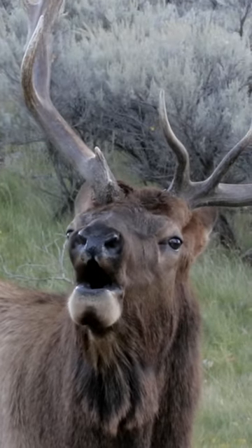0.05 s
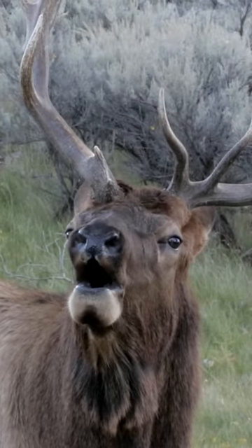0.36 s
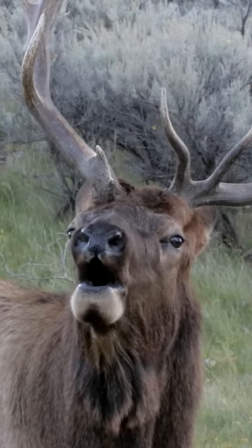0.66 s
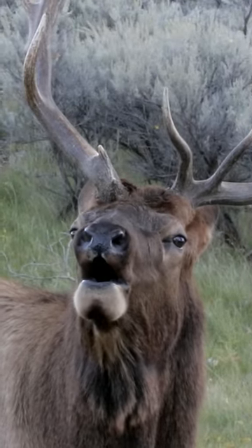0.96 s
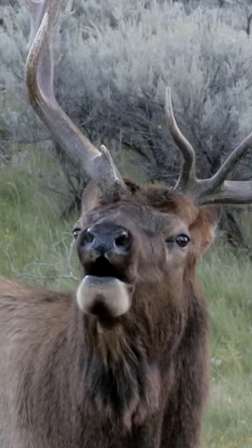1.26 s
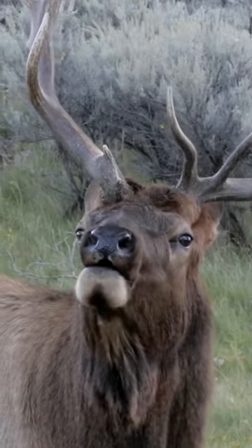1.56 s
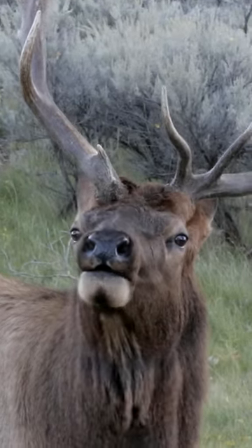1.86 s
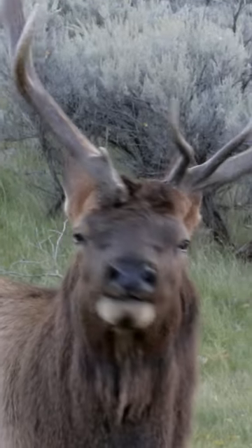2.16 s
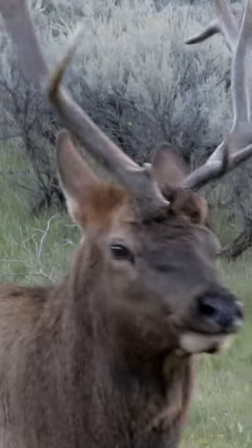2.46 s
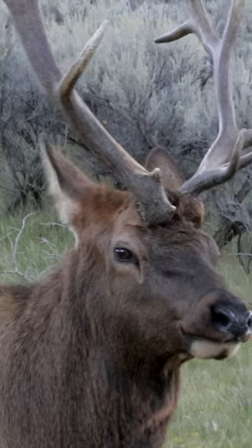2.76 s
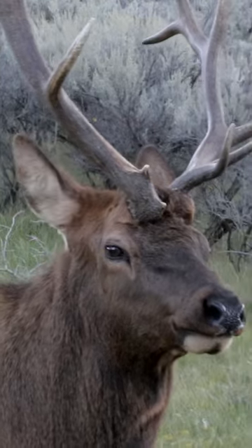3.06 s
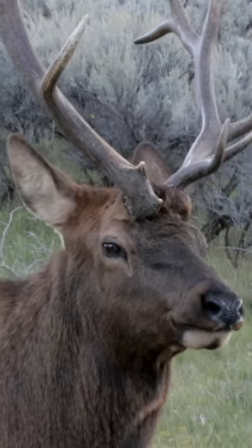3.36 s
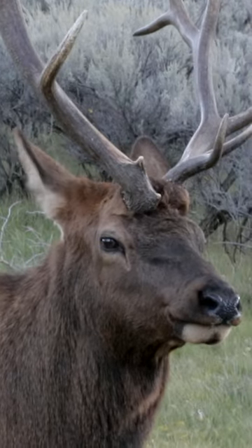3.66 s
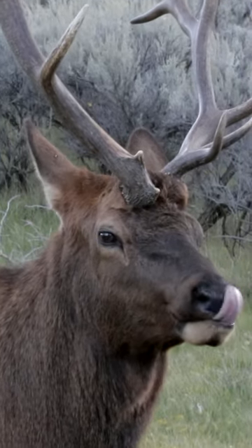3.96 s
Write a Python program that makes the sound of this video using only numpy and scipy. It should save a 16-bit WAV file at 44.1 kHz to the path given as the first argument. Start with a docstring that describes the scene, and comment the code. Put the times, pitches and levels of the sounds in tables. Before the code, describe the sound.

A bull elk bugles loudly close by in open country. Its high whistle holds for about 0.6 seconds, then slides down in steps over a hoarse roar, ending in a short whoop at 1.7 seconds with a faint echo. Small birds chirp faintly around 2 and 3.5 seconds, and two soft dry hisses come near 3 seconds. A quiet rumble and distant hum lie underneath.

```python
"""A bull elk bugles close by in open country: a high whistle holds, slides down in steps and ends in a
short whoop, over a hoarse low roar of the vocal folds that rings the resonances of his long throat.
The hillside returns a faint tail. Then small birds chirp and two dry hisses sound.
A quiet rumble and a far hum lie under it all."""
import sys
import numpy as np
from scipy import signal
from scipy.fft import rfft, irfft
from scipy.io import wavfile

SR = 44100
rng = np.random.default_rng(int(sys.argv[2]) if len(sys.argv) > 2 else 0)


def store_pcm(level_fs):
    """Save levels as 16-bit WAV."""
    pcm = np.round(np.clip(level_fs, -1, 1) * 32767).astype(np.int16)
    wavfile.write(sys.argv[1], SR, np.atleast_2d(pcm).T)


N = 176400
T = np.arange(N) / SR


def amp(db):
    """Decibels to gain."""
    return 10 ** (np.asarray(db) / 20)


def unit_rms(x):
    """Scales to rms 1."""
    return x / np.sqrt(np.mean(abs(x) ** 2) + 1e-20)


def curves(table):
    """Each value column of a time table, per sample."""
    times_s, *columns = np.transpose(table)
    return [np.interp(T, times_s, column) for column in columns]


def at_hz(table, hz):
    """Interpolates a table over log frequency."""
    table_hz, values = np.transpose(table)
    return np.interp(np.log(hz + 1), np.log(table_hz), values)


def colour(x, spectrum):
    """Filters x by a dB spectrum, to rms 1."""
    gain = amp(at_hz(spectrum, np.fft.rfftfreq(N, 1 / SR)))
    return unit_rms(irfft(rfft(x) * gain, N))


def drift(rate_hz):
    """Complex low-pass noise at rms 1."""
    white = rng.standard_normal(N) + 1j * rng.standard_normal(N)
    rolloff = (1 + (np.fft.fftfreq(N, 1 / SR) / rate_hz) ** 2) ** 1.346
    return unit_rms(np.fft.ifft(white / rolloff))


def phase_of(hz):
    """Running phase of a pitch curve."""
    return 2 * np.pi * np.cumsum(hz) / SR


def noise_tone(phase, width_hz):
    """Narrow noise band around a running phase."""
    return unit_rms((drift(width_hz) * np.exp(1j * phase)).real)


def hoarse_tone(phase, noise_share, width_hz):
    """Part sine, part noise band, at constant power."""
    clear = np.sqrt(2 * (1 - noise_share ** 2)) * np.cos(phase)
    return clear + noise_share * noise_tone(phase, width_hz)


# Each row: frequency in Hz, relative density in dB.
RUMBLE_SPECTRUM = [(12, -23.5), (20, 3), (86, -3.5), (124, -11), (227, -11), (261, -15.5), (364, -13.5),
                   (395, -16), (466, -19), (582, -19.5), (1260, -20.5), (2130, -31), (3600, -31.5),
                   (12100, -44.5), (14700, -57.5)]
# Each row: frequency in Hz, left-right correlation 0-1.
RUMBLE_CORRELATION = [(100, 0.92), (400, 0.73), (1500, 0.63), (5000, 0.64), (12000, 0.45)]
# Each row: frequency in Hz, width in Hz, level in dB.
HUM_TONES = [(108.6, 9.6, -75), (128.4, 6.7, -75), (262.5, 3.6, -77.5), (394, 5.5, -77.5)]


def rumble_and_hum(rumble_db=-64.5, left_bias_db=1.5):
    """Low outdoor rumble with a far wavering hum."""
    shared, own = (rfft(colour(rng.standard_normal(N), RUMBLE_SPECTRUM)) for _ in range(2))
    correlation = at_hz(RUMBLE_CORRELATION, np.fft.rfftfreq(N, 1 / SR))
    right = correlation * shared + np.sqrt(1 - correlation ** 2) * own
    rumble = amp(rumble_db) * irfft(np.array([shared, right]), N)
    hum = sum(amp(db) * noise_tone(2 * np.pi * hz * T, width_hz) for hz, width_hz, db in HUM_TONES)
    return (rumble + hum) * amp([[left_bias_db / 2], [-left_bias_db / 2]])


# Each row: frequency in Hz, T60 in seconds.
HILLSIDE_T60 = [(300, 0.31), (2500, 0.38), (6500, 0.68), (12000, 0.4)]


def hillside(x, density=.05, rise_s=.011):
    """Scattered echoes from brush and slope, different in each channel."""
    taps = rng.standard_normal((2, SR)) * (rng.random((2, SR)) < density)
    taps *= np.minimum(T[:SR] / rise_s, 1)
    hz, t, bands = signal.stft(taps, SR, nperseg=256)
    decay = amp(-60 * t / at_hz(HILLSIDE_T60, hz)[:, None])
    tail = signal.istft(bands * decay, SR, nperseg=256)[1]
    return signal.fftconvolve(x[None], tail / np.linalg.norm(tail[0]), axes=1)[:, :N]


# Each row: start in seconds, length in seconds, level in dB.
HISS_BURSTS = [(2.878, 0.15, -59.5), (3.075, 0.12, -57.5)]
# Each row: frequency in Hz, relative density in dB.
HISS_SPECTRUM = [(710, -54), (1200, -19), (1710, -9.5), (3180, -6.5), (3460, -9.5), (5440, 1.5),
                 (7140, -6.5), (8540, -15), (13500, -25), (14700, -34)]


def hisses(rise_s=.042, fall_s=.046, grain_db=3, grain_hz=270, echo_db=-8.5):
    """Two grainy bursts of hiss with their echo."""
    envelope = np.zeros(N)
    for start_s, length_s, db in HISS_BURSTS:
        rise = np.clip((T - start_s) / rise_s, 0, 1)
        fall = np.exp(-np.maximum(T - start_s - length_s + fall_s, 0) / fall_s)
        envelope += amp(db) * rise * fall
    grains = rng.standard_normal(N) * amp(grain_db * drift(grain_hz).real)
    out = envelope * colour(grains, HISS_SPECTRUM)
    return out + amp(echo_db) * hillside(out)


# Each row: start and length in seconds, first, middle and last pitch in Hz, level in dB, rasp 0-1.
BIRD_NOTES = [(2.026, 0.036, 4360, 4530, 5880, -67.5, 0.9), (2.055, 0.026, 2890, 4220, 3120, -58, 0.6),
              (2.068, 0.037, 3475, 3204, 3040, -67.5, 0.47), (2.081, 0.035, 6830, 5180, 6300, -69.5, 0.97),
              (2.103, 0.025, 3000, 3280, 2750, -59, 0.2), (2.118, 0.037, 2900, 2830, 2570, -60, 0.07),
              (2.76, 0.092, 8380, 7270, 6600, -74, 1), (3.318, 0.049, 1750, 1914, 1593, -73, 0.7),
              (3.501, 0.028, 2940, 3460, 5550, -71, 1), (3.511, .062, 5020, 6590, 5520, -57.5, 0.48),
              (3.517, 0.052, 7400, 8500, 8700, -69, 0.7), (3.515, 0.07, 4670, 4590, 4860, -70, 0.6),
              (3.524, 0.042, 2164, 2250, 2620, -72, 0.6), (3.976, 0.074, 4380, 4940, 4570, -68, 0.8)]


def birds(octave_db=-22, echo_db=-3):
    """Short glides, some raspy, with their echo."""
    out = np.zeros(N)
    waver = 1 + .02 * drift(rate_hz=356).real
    noise = drift(rate_hz=800)
    for start_s, length_s, *pitches_hz, db, rasp in BIRD_NOTES:
        span = (T > start_s) & (T < start_s + length_s)
        progress = (T[span] - start_s) / length_s
        glide_hz = np.polyval(np.polyfit([0, .5, 1], pitches_hz, 2), progress)
        carrier = np.exp(1j * phase_of(glide_hz * waver[span]))
        tone = (np.sqrt(1 - rasp ** 2) + rasp * noise[span]) * carrier
        octave = amp(octave_db) * noise[span] * carrier ** 2
        out[span] += amp(db) * np.sqrt(2 * np.sin(np.pi * progress)) * (tone + octave).real
    return out + amp(echo_db) * hillside(out)


def resonate(x, modes, stretch):
    """Parallel steep resonances, all tuned by one stretch factor."""
    out, phase_per_hz = 0, phase_of(stretch)
    for hz, width_hz, db in modes:
        carrier = np.exp(1j * hz * phase_per_hz)
        pole = np.exp(-np.pi * width_hz / SR)
        baseband = signal.lfilter([(1 - pole) ** 2], [1, -2 * pole, pole * pole], x * carrier.conj())
        out = out + amp(db) * (carrier * baseband).real
    return unit_rms(out)


# Throat resonances in four bands. Each row: frequency in Hz, width in Hz, relative gain in dB.
THROAT_BASS = [(627.6, 77.5, 7.5), (692.7, 21, 13.5), (739, 60, 11.5), (1032, 58, 5.5), (1129, 26, 4)]
THROAT_MIDDLE = [(1487, 85, -3), (1663, 41, -11), (2007, 50, -4.5), (2127.5, 83, 4), (2293, 170, -2)]
THROAT_UPPER = [(2543, 130, 1), (2650, 59, -1), (2878, 90, -5.5), (3237, 170, -11.5)]
THROAT_TREBLE = [(3666, 120, -1.5), (4227, 110, 1.5), (4720, 190, -6), (5270, 94, -1.5), (5755, 260, 1.5),
                 (6310, 600, -1.5), (6950, 300, -2), (7684, 250, 0.5), (8285, 350, 1), (9060, 260, -5),
                 (9574, 390, -7.5), (10150, 1700, -14), (11800, 1000, -23)]
# Each row: time in seconds, then bass, middle, upper and treble level in dB.
THROAT_LEVELS = [(0, -45, -43.5, -48.5, -50), (.5, -53, -40.5, -47.5, -51), (.62, -46, -47, -49.5, -52),
                 (.8, -46.5, -45.5, -52, -51), (1.08, -47.5, -49.5, -54, -59), (1.27, -48.5, -49, -56, -62),
                 (1.6, -58, -64, -76.5, -73.5), (1.655, -52.5, -57.5, -58, -70),
                 (1.695, -60.5, -64, -67, -87), (1.735, -77, -65, -62, -86), (1.78, -100, -100, -100, -110)]
# Antiresonances of mouth and nose. Each row: frequency in Hz, width in Hz.
MOUTH_NOTCHES = [(885, 120), (1780, 67), (3600, 160), (4080, 110), (7950, 1000)]


def throat(drive, treble_drive, pitch_ratio, voiced, surge_db=1.5):
    """The long throat rings in four bands; mouth and nose cut notches."""
    bass, middle, upper, treble = amp(curves(THROAT_LEVELS))
    wander = 1 + .008 * drift(rate_hz=5).real
    follow = pitch_ratio ** .036  # bass resonances rise slightly with the roar's pitch
    out = bass * resonate(drive, THROAT_BASS, wander * follow)
    out += middle * resonate(drive, THROAT_MIDDLE, wander)
    out += upper * resonate(drive, THROAT_UPPER, wander)
    out *= amp(surge_db * voiced * drift(rate_hz=7).real)
    out += treble * resonate(treble_drive, THROAT_TREBLE, np.ones(N))
    for hz, width_hz in MOUTH_NOTCHES:
        out = signal.lfilter(*signal.iirnotch(hz, hz / width_hz, SR), out)
    return out


# Each row: time in seconds, pitch in Hz, roughness 0-1.
ROAR_CONTOUR = [(0, 124.1, 0.8), (.5, 125.6, 0.78), (.68, 131.7, 0.44), (.77, 150.9, 0.35),
                (.94, 162.4, 0.35), (1.3, 149.5, 0.36), (1.385, 134.6, 0.4), (1.6, 132, 0.35),
                (1.7, 124.7, 0.77)]
# Each row: frequency in Hz, relative gain in dB.
CHEST_RESPONSE = [(60, -44), (140, -7.5), (270, -4), (400, -4), (550, -5.5), (900, -26.5), (2000, -54)]
# Low partials of the roar. Each row: time in seconds, level in dB.
CHEST_ENVELOPE = [(0, -94), (.55, -68.5), (.75, -66.5), (1, -66), (1.2, -68), (1.35, -63.5), (1.62, -63.5),
                  (1.69, -54), (1.76, -86)]


def roar(whistle_phase, whistle_overtones, jitter=.05244, sideband_gain=.8, overtone_gain=.65):
    """Uneven vocal fold pulses, the whistle they chop into sidebands, and air puffs ring the throat."""
    hz, rough = curves(ROAR_CONTOUR)
    phase = phase_of(hz * (1 + jitter * rough * drift(rate_hz=60).real))
    folds = unit_rms(sum(np.cos(k * phase) for k in range(1, 28)))
    chopper = sum(np.cos(k * phase) / np.sqrt(k) for k in range(1, 9))
    sidebands = unit_rms(chopper * (np.cos(whistle_phase) + np.cos(2 * whistle_phase)))
    cycle = phase / (2 * np.pi) % 1
    puffs = unit_rms((1 + .2 * np.exp(-cycle / .53)) * rng.standard_normal(N))
    voiced, breathy = np.array([1 - rough, rough]) / np.hypot(rough, 1 - rough)
    drive = voiced * unit_rms(folds + sideband_gain * sidebands) + breathy * puffs
    treble_drive = puffs + overtone_gain * whistle_overtones
    chest = amp(curves(CHEST_ENVELOPE)[0]) * colour(voiced * folds + breathy * puffs, CHEST_RESPONSE)
    return throat(drive, treble_drive, hz / hz[0], voiced) + chest


# Each row: time in seconds, pitch in Hz, level in dB, noise share 0-1.
HIGH_WHISTLE_CONTOUR = [(0, 2605, -41, .95), (.5, 2461, -43, .8), (.52, 2343, -48.5, .6),
                        (.69, 2309, -37.5, .3), (.74, 2233, -42, .4), (.82, 2262, -35.5, .4),
                        (.85, 2127, -31, 0.4), (.95, 2102, -38, 0.6), (1, 2008, -49.5, .5),
                        (1.1, 1958, -49, .4), (1.2, 1872, -100, .5)]


def high_whistle(width_hz=70, octave_db=-31.5):
    """A hoarser whistle above the main one, with a weak octave."""
    hz, db, noise_share = curves(HIGH_WHISTLE_CONTOUR)
    phase = phase_of(hz)
    tone = hoarse_tone(phase, noise_share, width_hz)
    octave = amp(octave_db) * hoarse_tone(2 * phase, noise_share, width_hz)
    return amp(db) * (tone + octave)


# Each entry: time in seconds of a jump to a lower register.
REGISTER_BREAKS_S = [.662, .758, .925, 1.135, 1.463]


def break_ringing(hz, phase, levels_db, t60_s=.2, rise_s=.0075):
    """At each register break the old pitch dies away under the new one."""
    out = np.zeros(N)
    for start_s in REGISTER_BREAKS_S:
        i = round(start_s * SR)
        t = T[:N - i]
        envelope = amp(-60 * t / t60_s) * np.minimum(t / rise_s, 1)
        held_phase = phase[i] + 2 * np.pi * hz[i] * t
        out[i:] += envelope * sum(amp(db[i]) * np.cos(k * held_phase) for k, db in enumerate(levels_db, 1))
    return out


# Each row: time in seconds, pitch in Hz, levels of partials 1, 2 and 3 in dB.
WHISTLE_CONTOUR = [(0, 1904, -38.5, -61, -66), (.545, 1903, -41, -61.5, -58), (.59, 1860, -49.5, -82, -53),
                   (.662, 1815, -56.5, -74, -68), (.672, 1689, -54, -71, -61),
                   (.71, 1703, -41, -49.5, -59.5), (.758, 1700, -44.5, -43.5, -66),
                   (.772, 1659, -57.5, -54.5, -56), (.81, 1605, -42.5, -47, -68),
                   (.855, 1549, -33, -50.5, -65), (.925, 1462, -31.5, -61, -61),
                   (.965, 1428, -37, -47.5, -59), (.995, 1357, -51, -43, -64),
                   (1.135, 1247, -59.5, -45, -82), (1.148, 1137, -42.5, -47, -69),
                   (1.175, 1149, -39.5, -44, -65), (1.235, 1083, -40, -46.5, -65),
                   (1.255, 1080, -43, -36.5, -70), (1.278, 1071, -42, -35.5, -66.5),
                   (1.335, 1039, -37.5, -54, -62), (1.358, 1031, -39, -33, -57),
                   (1.39, 1029, -39.5, -62, -75), (1.435, 1016, -39.5, -48, -54.5),
                   (1.463, 1013, -46, -56, -57), (1.476, 961, -62, -53, -49.5),
                   (1.552, 938, -58, -48.5, -55), (1.6, 880, -63, -79, -52.5),
                   (1.617, 820, -63, -51.5, -51), (1.628, 793.5, -43.5, -42.5, -65),
                   (1.648, 727, -34, -54.5, -77), (1.668, 598, -41, -69, -63),
                   (1.705, 430.4, -100, -110, -110)]
# Each entry: noise share 0-1, for partials 1, 2 and 3.
PARTIAL_NOISE_SHARES = [.07, .25, .5]
# Each row: time in seconds, level in dB.
FOURTH_PARTIAL_ENVELOPE = [(0, -77), (.6, -89), (.75, -66), (1.25, -73.5), (1.36, -65.5), (1.62, -70.5),
                           (1.69, -110)]


def whistle(jitter=.0046, waver=.013):
    """Partials, each hoarser than the last; also returns phase and overtones to drive the throat."""
    hz, *levels_db = curves(WHISTLE_CONTOUR)
    fallen = 1 - hz / hz.max()
    wobble = 1 + jitter * drift(rate_hz=67.7).real + waver * fallen * drift(rate_hz=24).real
    phase = phase_of(hz * wobble)
    tone = break_ringing(hz, phase, levels_db)
    for k, (db, noise_share) in enumerate(zip(levels_db, PARTIAL_NOISE_SHARES), 1):
        tone += amp(db) * hoarse_tone(k * phase, noise_share, width_hz=45 * k)
    fourth = hoarse_tone(4 * phase, noise_share=.88, width_hz=110)
    tone += amp(curves(FOURTH_PARTIAL_ENVELOPE)[0]) * fourth
    overtones = unit_rms(sum(noise_tone(k * phase, width_hz=220) for k in range(4, 11)))
    return tone, phase, overtones * (.3 + fallen)


# Each row: frequency in Hz, left minus right level in dB.
ELK_LEFT_BIAS = [(700, -.5), (1050, 0), (1460, 2.5), (1900, -6.5), (2150, -3), (2600, -1), (4200, 3),
                 (5700, 1), (7000, -8.5), (9000, -5.5), (14000, -5.5)]
# Each row: frequency in Hz, left phase lead in radians.
ELK_LEFT_LEAD = [(1000, 0), (1460, -1.23), (1900, -0.75), (2550, 0.74), (4200, 0.346), (5700, -1.23),
                 (7000, -1.25), (9000, -0.97)]


def elk(echo_db=-12.5):
    """The bugle: both whistles and the roar, placed in stereo, with a faint hillside tail."""
    tone, phase, overtones = whistle()
    call = tone + high_whistle() + roar(phase, overtones)
    hz = np.fft.rfftfreq(2 * N, 1 / SR)
    left = amp(at_hz(ELK_LEFT_BIAS, hz) / 2) * np.exp(.5j * at_hz(ELK_LEFT_LEAD, hz))
    direct = irfft(rfft(call, 2 * N) * np.array([left, 1 / left]))[:, :N]
    return direct + amp(echo_db) * hillside(call)


def scene():
    """Stereo sum of all sources."""
    return elk() + birds() + hisses() + rumble_and_hum()


def record(dry):
    """Low-pass at 14.8 kHz."""
    lowpass = signal.firwin(511, 14800, window=("kaiser", 9), fs=SR)
    return signal.oaconvolve(dry, lowpass[None], "same")


dry = scene()
out = record(dry)
store_pcm(out)
```